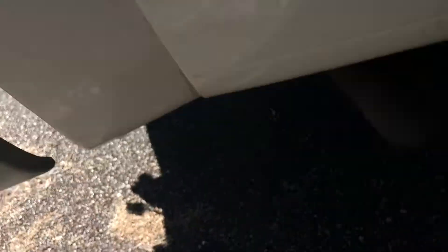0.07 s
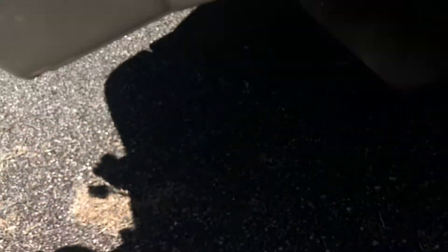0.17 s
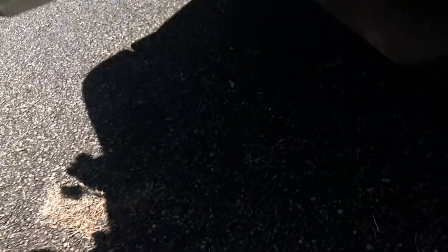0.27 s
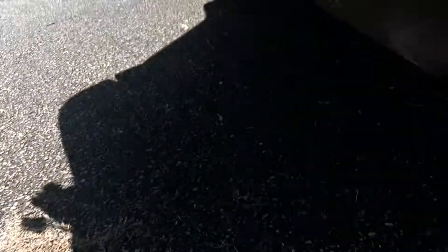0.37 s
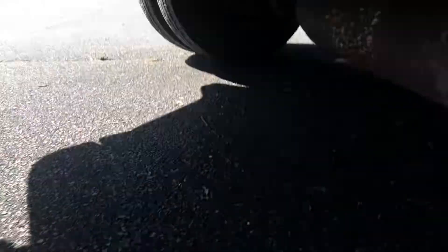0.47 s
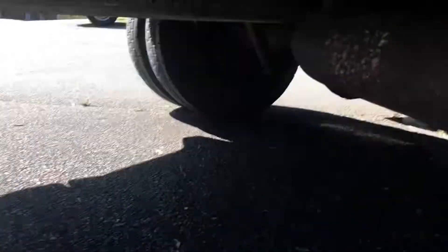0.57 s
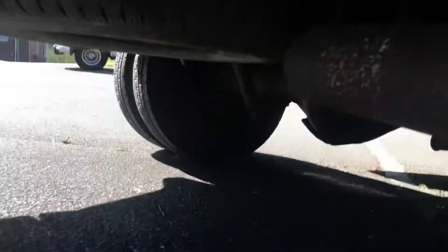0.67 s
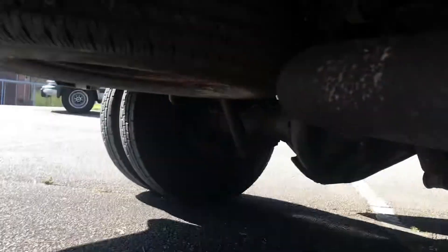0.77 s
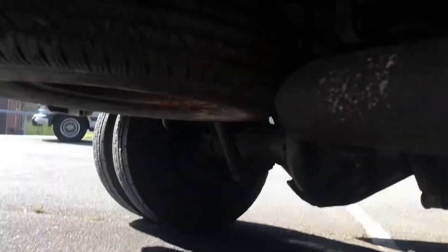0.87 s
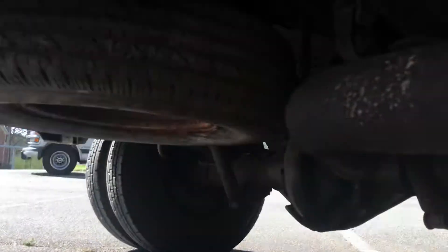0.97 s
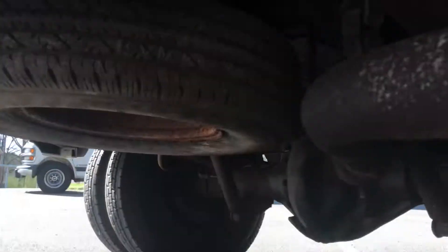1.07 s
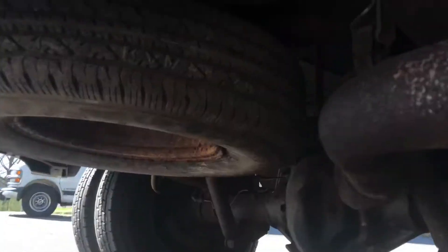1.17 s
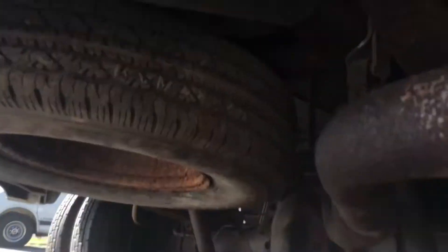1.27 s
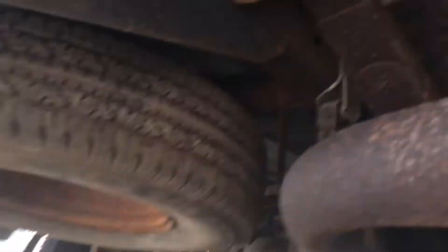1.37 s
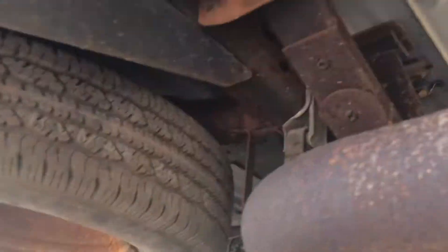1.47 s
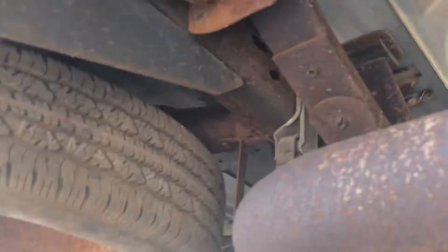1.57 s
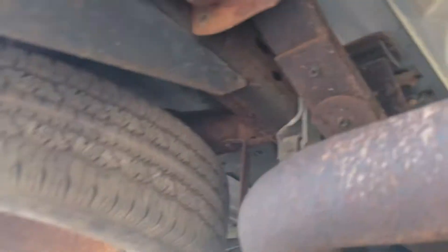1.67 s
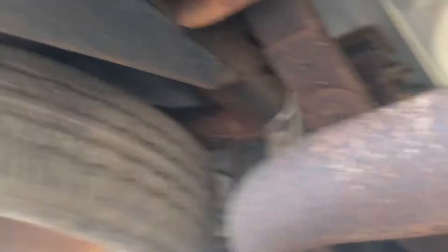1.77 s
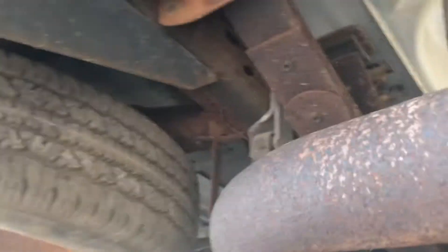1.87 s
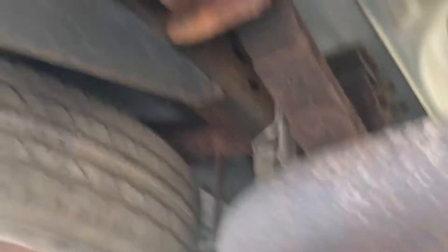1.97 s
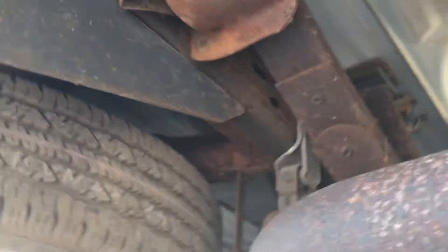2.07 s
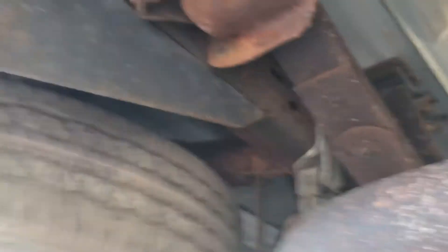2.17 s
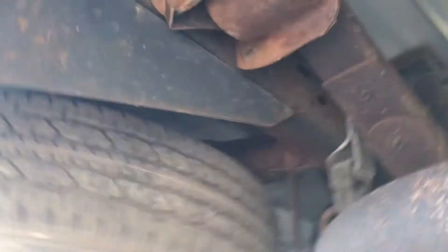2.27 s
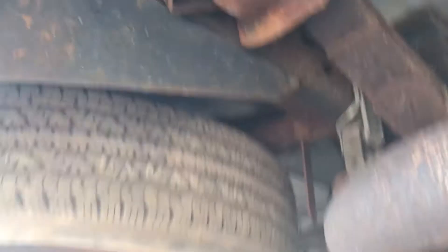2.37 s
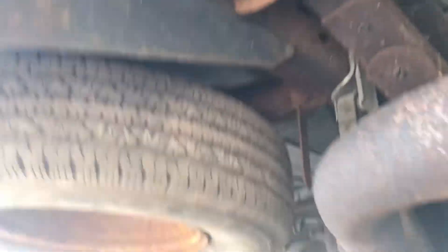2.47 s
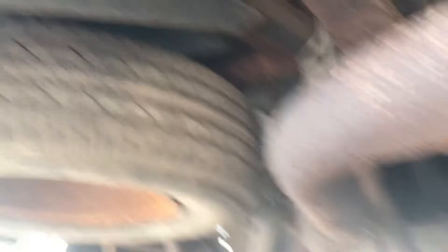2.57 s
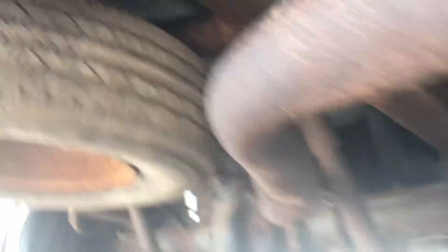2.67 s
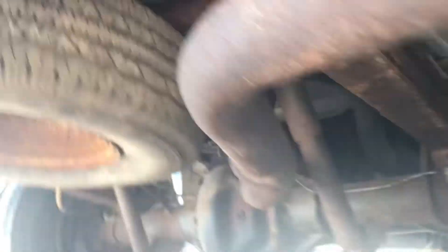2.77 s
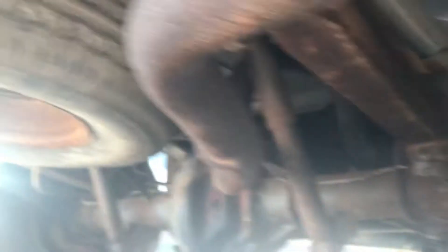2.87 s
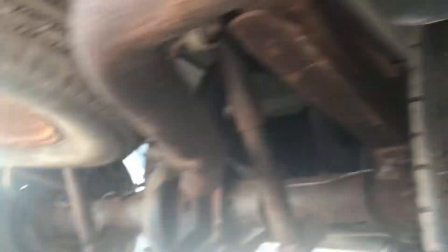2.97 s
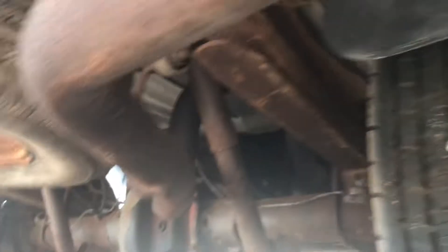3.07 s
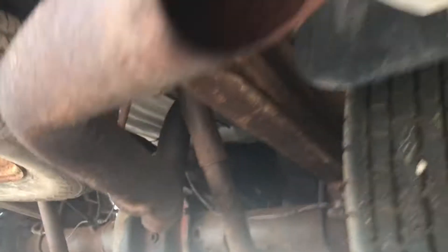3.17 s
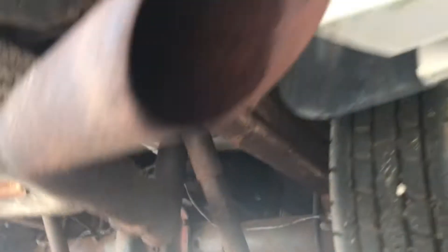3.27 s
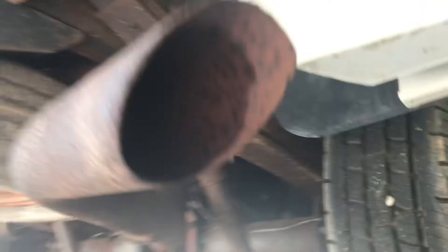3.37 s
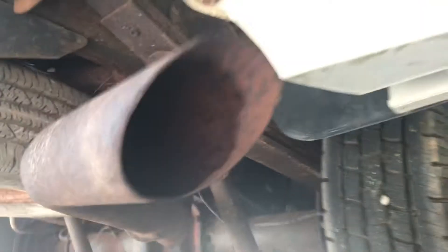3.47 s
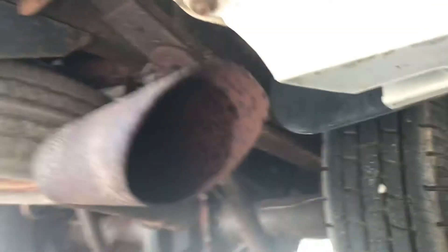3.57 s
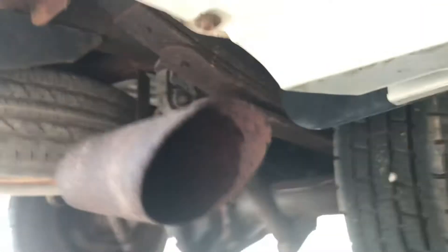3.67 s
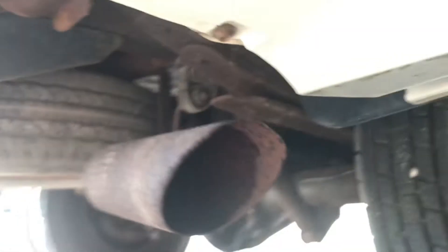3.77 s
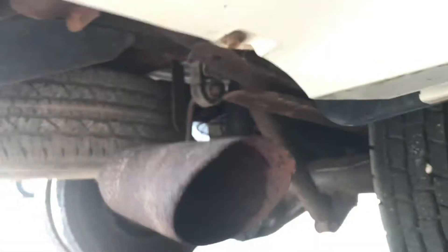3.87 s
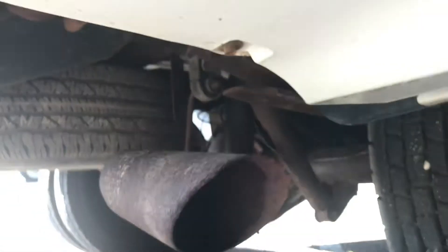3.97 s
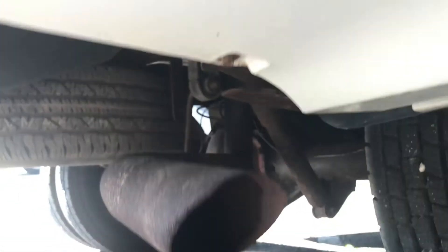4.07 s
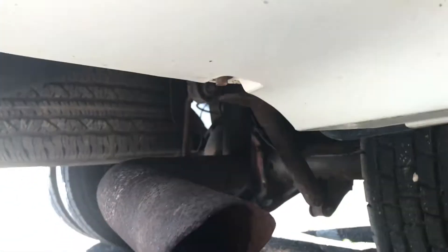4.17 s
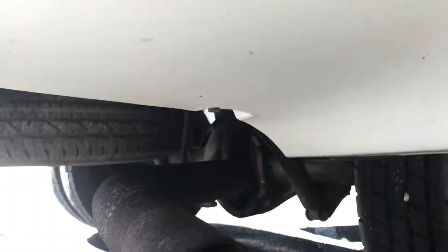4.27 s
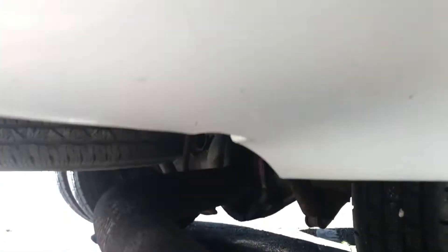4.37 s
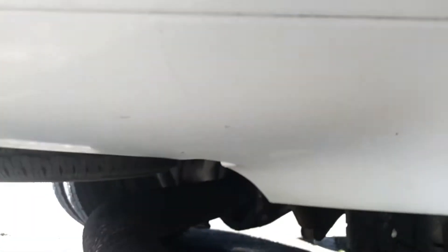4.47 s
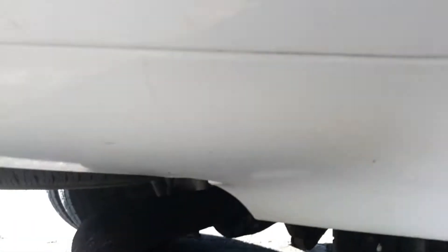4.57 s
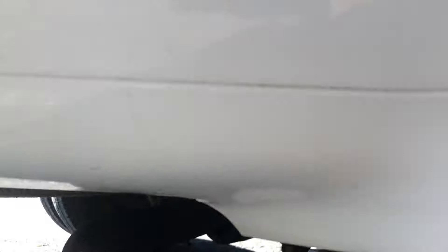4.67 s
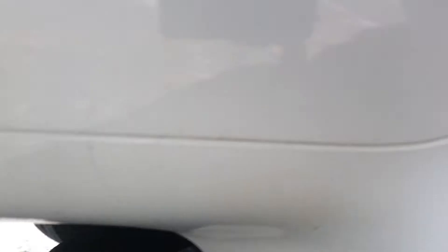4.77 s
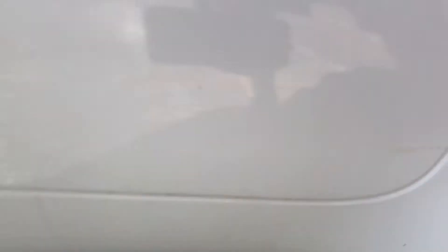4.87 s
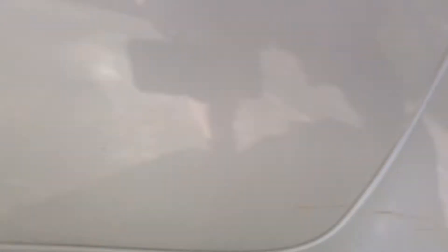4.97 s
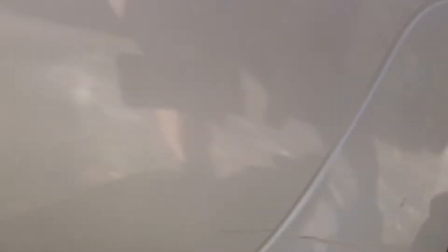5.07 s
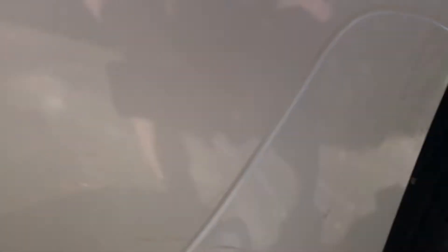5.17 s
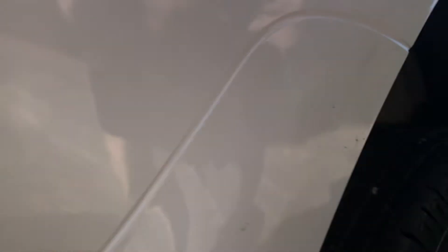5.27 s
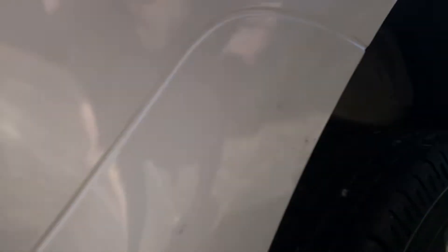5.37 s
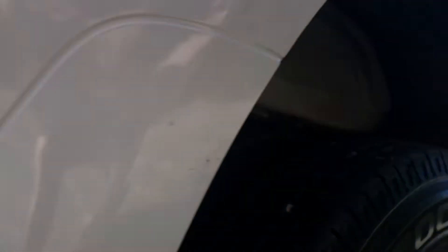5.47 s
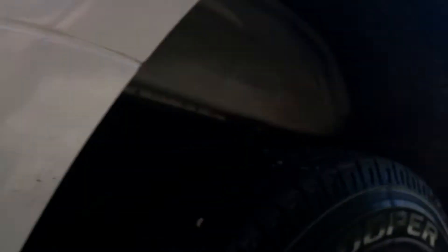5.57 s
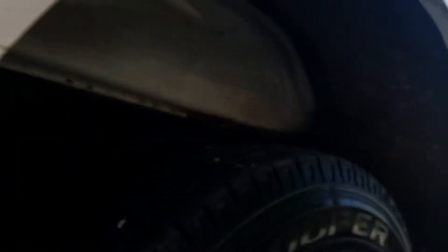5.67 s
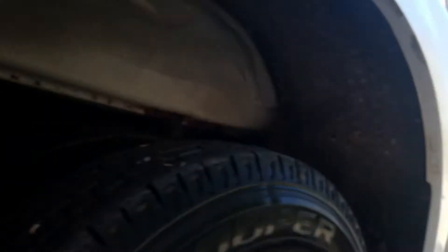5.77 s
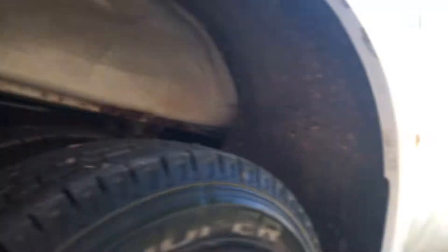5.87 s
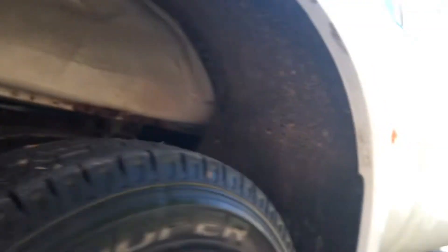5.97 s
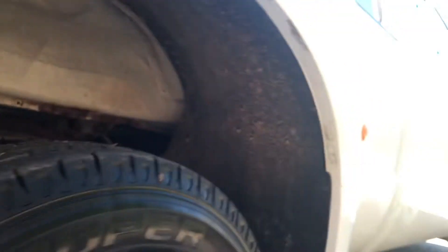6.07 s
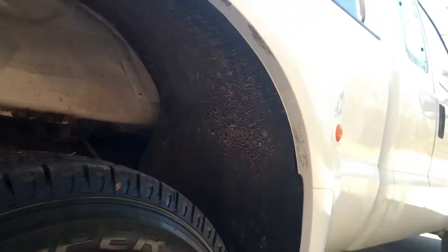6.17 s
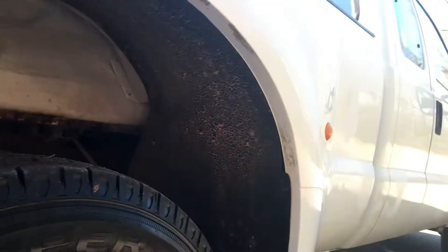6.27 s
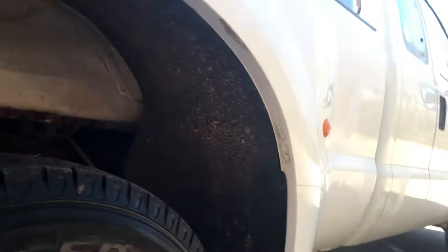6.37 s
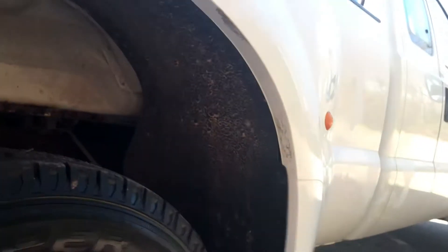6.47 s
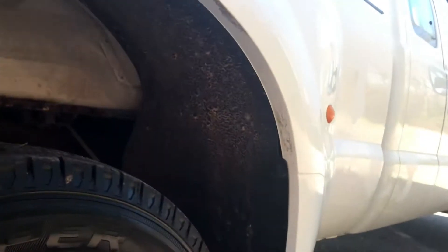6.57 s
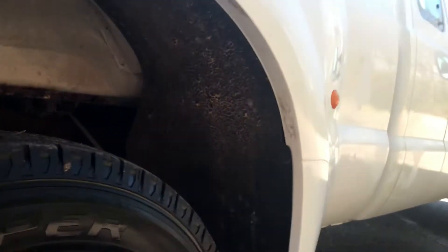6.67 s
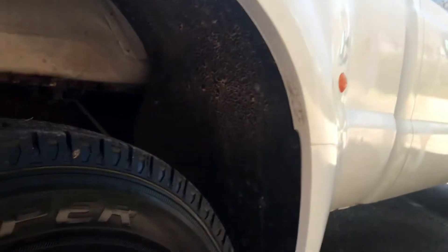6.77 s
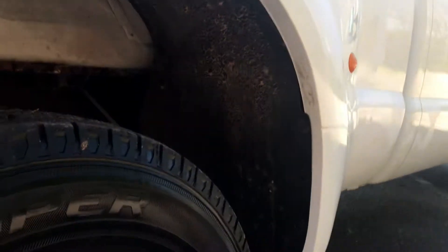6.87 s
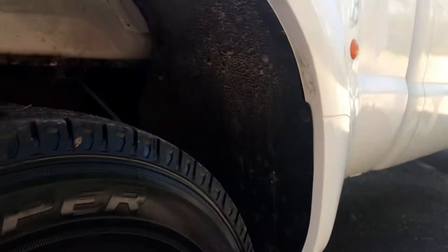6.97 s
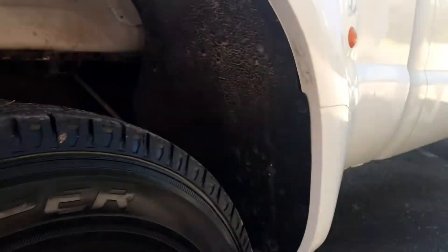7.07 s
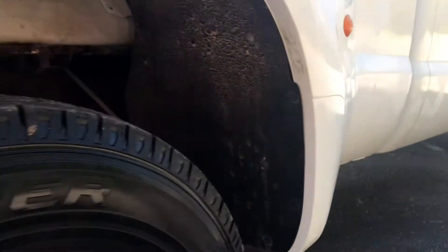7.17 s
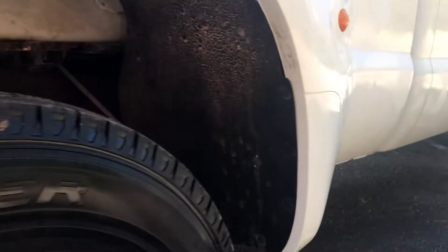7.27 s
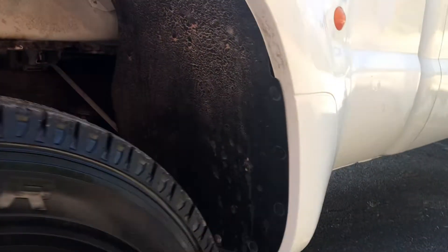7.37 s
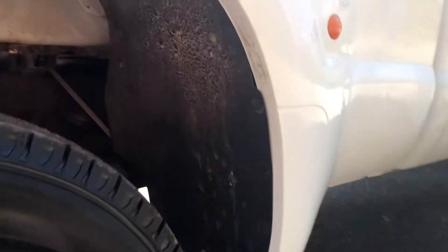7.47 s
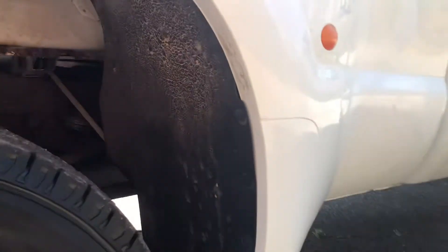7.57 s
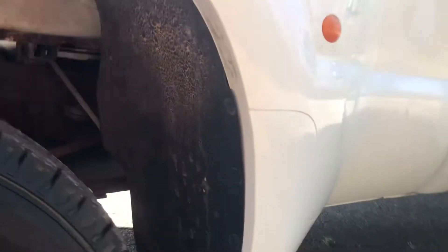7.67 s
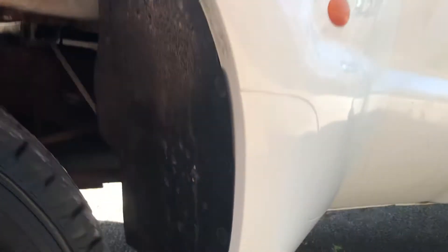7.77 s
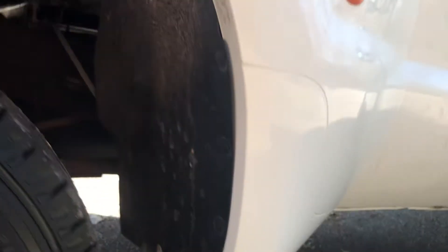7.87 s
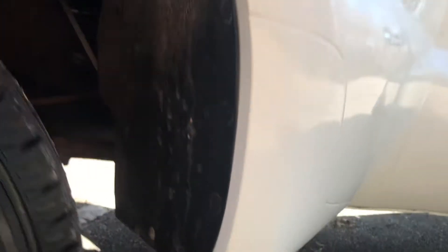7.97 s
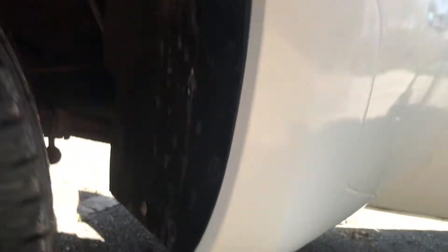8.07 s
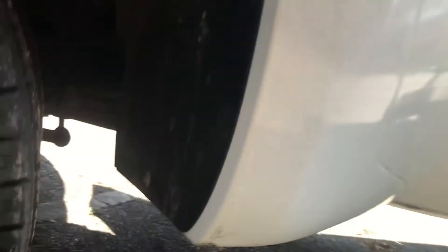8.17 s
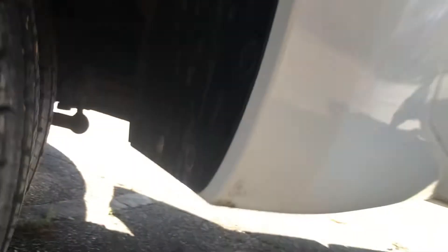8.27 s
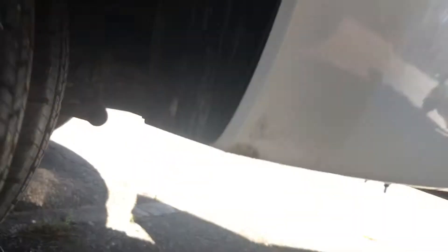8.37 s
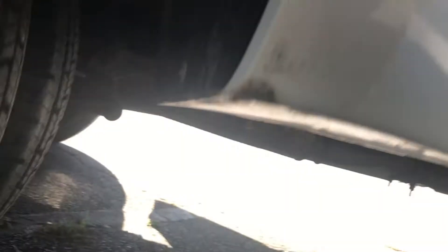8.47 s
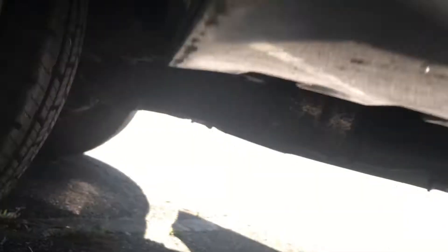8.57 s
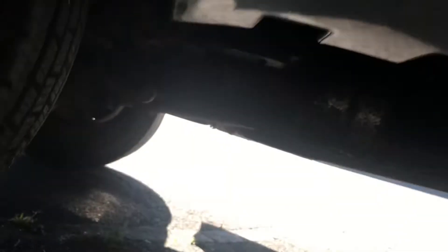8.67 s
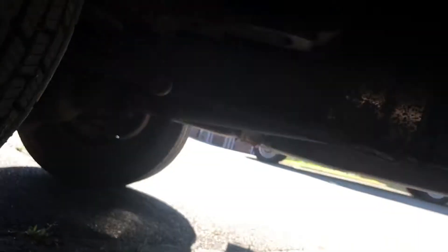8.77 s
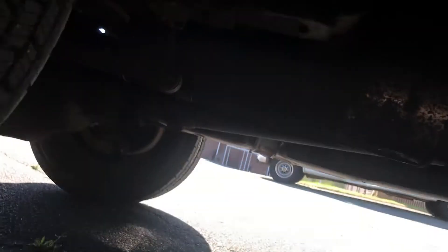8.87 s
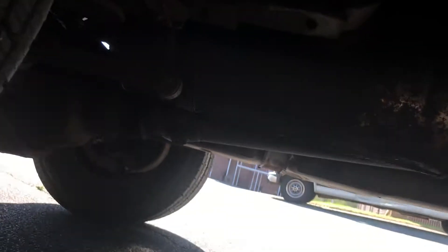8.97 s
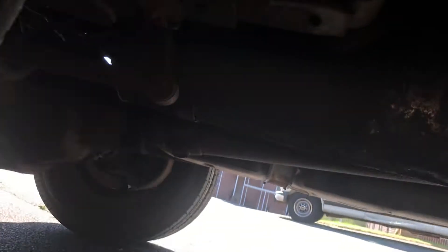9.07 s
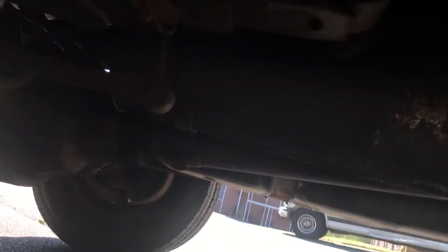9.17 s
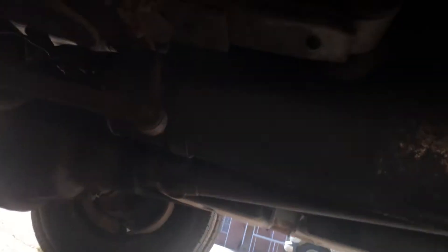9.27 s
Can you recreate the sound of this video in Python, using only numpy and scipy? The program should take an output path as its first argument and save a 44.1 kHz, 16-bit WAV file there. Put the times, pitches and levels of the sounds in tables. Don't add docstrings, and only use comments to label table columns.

```python
import sys
import numpy as np
from scipy import signal
from scipy.fft import rfft, irfft, next_fast_len
from scipy.io import wavfile
from scipy.ndimage import uniform_filter1d, map_coordinates

SR = 44100
rng = np.random.default_rng(int(sys.argv[2]) if len(sys.argv) > 2 else 0)


def invert_db(level):
    return 10 ** (np.asarray(level, dtype=float) / 20)


def persist_wave(psi):
    counts = np.round(np.clip(psi, -1, 1) * 32767).astype(np.int16)
    wavfile.write(sys.argv[1], SR, np.atleast_2d(counts).T)


N = 411012


def unit(x):
    return x / np.sqrt(np.mean(x ** 2) + 1e-20)


def along(points, hz):
    point_hz, value = np.transpose(points)
    return np.interp(np.log(hz + 1), np.log(point_hz + 1), value)


def curves(rows):
    time_s, *columns = np.transpose(rows)
    return [np.interp(np.arange(N) / SR, time_s, column) for column in columns]


def wobble(rate_hz):
    knots = rng.standard_normal(int(N * rate_hz / SR) + 4)
    return map_coordinates(knots, [np.arange(N) * rate_hz / SR])


def filtered(x, response):
    size = next_fast_len(len(x) + SR // 2)
    return irfft(rfft(x, size) * response(np.fft.rfftfreq(size, 1 / SR)), size)[:len(x)]


def colour(points):
    return lambda hz: invert_db(along(points, hz))


def causal(points):
    def response(hz):
        cepstrum = irfft(np.log(invert_db(along(points, hz))))
        half = len(cepstrum) // 2
        cepstrum[1:half] *= 2
        cepstrum[half + 1:] = 0
        return np.exp(rfft(cepstrum))
    return response


def mode(centre_hz, width_hz):
    def response(hz):
        damping = 1j * hz * width_hz
        return (damping / (centre_hz ** 2 - hz * hz + damping)) ** 2
    return response


def combed(depth_db):
    size, bins, frames = 4096, 3, 9
    bands = signal.stft(rng.standard_normal(N + size), nperseg=size)[2]
    field = uniform_filter1d(rng.standard_normal(bands.shape), bins, 0)
    field = uniform_filter1d(field, frames, 1)
    return signal.istft(bands * invert_db(depth_db * unit(field)), nperseg=size)[1][:N]


def by_place(noise, spectra):
    # start_s, place (0 under the tail, 1 at the pipe, 2 alongside)
    path = [(0, 0.29), (2.85, 0.085), (3.0, 0.81), (5.5, 1.36), (6.2, 2), (9.32, 2.1)]
    # centre_hz, width_hz, lift_db
    panels = [(406, 9, 4.5), (596.4, 8.9, 2.5), (700, 14, 4), (813, 14, 2.5), (1057, 15, 2.5),
              (1218, 27, 2), (1362, 15, 1), (1547, 12, 3), (1964, 15, 1), (2240, 13, -1), (2470, 30, 1.5),
              (2615, 18, 1.5)]
    place, = curves(path)

    def lift_db(hz):
        return sum(db * np.exp(-.5 * ((hz - centre) / width) ** 2) for centre, width, db in panels)

    out = np.zeros(N)
    for k, points in enumerate(spectra):
        share = np.clip(1 - abs(place - k), 0, 1)
        out += share * unit(filtered(noise, lambda hz: invert_db(along(points, hz) + lift_db(hz))))
    return out


def hum(firings, tone_db, octave_db):
    # multiple of the firing rate,
    # level_db re octave
    orders = [(.5, -17.5), (1.5, -8.5), (1.7, -10), (1.79, -6.5), (2.2, -7.5), (2.3, -13), (3, -14.5),
              (3.3, -12), (4.8, -21.5), (5, -21.5)]
    octave_lag_rad, third_lag_rad = 0.69, -1.94
    turn = 2 * np.pi * firings
    out = invert_db(tone_db + 0.35 * wobble(14)) * np.cos(turn)
    octave_phase = 2 * turn - octave_lag_rad + 0.48 * wobble(6)
    out += invert_db(octave_db + 0.77 * wobble(12)) * np.cos(octave_phase)
    for order, db in orders:
        start = -third_lag_rad if order == 3 else rng.uniform(0, 2 * np.pi)
        level = invert_db(octave_db + db + 1.9 * wobble(4.6))
        out += level * np.cos(order * turn + start + 0.32 * wobble(4))
    return np.sqrt(2) * out


def thumps(firings, thump_db, second_db, third_db):
    # freq_hz, level_db
    pipe = [(20, -38.5), (31, 1), (50, 3.5), (63, 5), (82, 0.5), (100, 0), (160, 3.5), (190, 4.5),
            (225, -3.5), (255, -6), (280, -27.5), (400, -52), (1500, -120)]
    # start_s, level_db
    late_burns = [(0.647, -11.5), (1.299, -21), (2.524, -24), (2.66, -22), (2.912, -25), (3.098, -22),
                  (3.801, -31), (4.07, -22), (4.459, -21), (5.034, -37), (5.338, -15), (7.262, -33),
                  (8.039, -27)]
    at = np.flatnonzero(np.diff(np.floor(firings)))
    jitter, strength, spread = rng.standard_normal((3, len(at)))
    surplus = np.zeros(N)
    moments = np.clip(at + (.002 * SR * jitter).astype(int), 0, N - 1)
    surplus[moments] = strength * invert_db(1.8 * spread)
    drive = unit(surplus) + .5 * rng.standard_normal(N)
    pops = np.zeros(N)
    for start_s, db in late_burns:
        pops[round(start_s * SR)] = -invert_db(db + 30)
    low = invert_db(thump_db + 3) * unit(filtered(drive, causal(pipe))) + filtered(pops, causal(pipe))
    second = invert_db(second_db - 3) * unit(filtered(drive, mode(centre_hz=206, width_hz=19)))
    third = invert_db(third_db) * unit(filtered(drive, mode(centre_hz=305, width_hz=22.7)))
    return low + second + third


def rush(firings):
    # start_s, rasp_db, bay_db, valve_db, air_db
    levels = [(0.0, -49.5, -55, -71, -80), (0.54, -47.5, -51.5, -67.5, -78), (1.27, -49.5, -50.5, -65, -79),
              (1.66, -46.5, -50, -66, -77), (2.31, -50, -49.5, -66, -78), (2.59, -47.5, -50, -64.5, -78),
              (3.01, -46.5, -50, -67, -78), (3.32, -44.5, -52, -67, -79), (3.68, -48.5, -54, -68, -80),
              (4.15, -46.5, -55, -69.5, -80), (4.54, -46, -54, -65.5, -77), (4.93, -46.5, -56, -69.5, -79),
              (5.42, -51, -54, -67.5, -81), (5.89, -52.5, -52.5, -64, -77), (6.23, -52, -50.5, -62, -72),
              (6.59, -50.5, -49.5, -62.5, -75), (7.17, -50, -50.5, -62.5, -75),
              (7.42, -49.5, -48, -60.5, -73), (7.87, -49, -49, -60, -76), (8.07, -48, -47, -58, -72),
              (8.33, -47.5, -47.5, -60, -74), (8.64, -45.5, -46.5, -58, -69), (8.8, -46, -46, -58, -74),
              (9.32, -43, -45, -59, -73)]
    # freq_hz, level_db
    rasp_colours = [
        [(190, -45), (330, -6), (350, -8.5), (409, -4), (438, -7.5), (493, -10.5), (565, -2.5), (631, -8.5),
         (707, -1), (777, -7), (890, -1.5), (1150, -21), (1500, -44), (2530, -120)],
        [(190, -29), (330, -13.5), (361, -13), (409, 0.5), (451, -14), (496, 0.5), (553, -5), (605, 4),
         (745, -9), (828, 0), (1060, -21), (1150, -20), (1500, -48.5), (2530, -120)],
        [(190, -23), (330, -4), (444, -8), (476, -4.5), (580, 0), (661, -1), (781, -7), (845, -3), (914, -8),
         (1020, -12), (1110, -24), (1150, -16), (1500, -43), (2530, -120)],
    ]
    bay_colours = [
        [(620, -11), (1050, -0.5), (1100, -4), (1380, -2.5), (1470, -5.5), (1750, -9.5), (2010, -9),
         (2530, -10), (3320, -17.5), (3990, -19.5), (4800, -39.5), (6240, -55), (10600, -120)],
        [(620, -38), (1050, -5), (1500, 0.5), (1610, -6.5), (2000, -7.5), (2170, -10), (2320, -6.5), (2670, -9),
         (3100, -14.5), (3890, -18), (4800, -40), (6240, -60), (10600, -120)],
        [(620, -28), (1050, -7), (1110, -6.5), (1250, -3.5), (1370, -3), (1560, 1.5), (1680, -4.5),
         (2850, -8.5), (3110, -11), (4070, -16.5), (4800, -44), (6240, -52), (10600, -120)],
    ]
    # freq_hz, level_db
    valve_colour = [(2590, -15), (4400, 1.5), (5040, -4), (6310, -1.5), (7070, -3.5), (7470, -8),
                    (8250, -6.5), (10600, -16.5), (13800, -47), (22000, -120)]
    # freq_hz, level_db
    air_colour = [(6000, -30.5), (10200, 0), (10600, -2), (11600, 3.5), (15100, -0.5), (15600, -7.5)]
    rasp_db, bay_db, valve_db, air_db = curves(levels)
    puff_s = 6.885
    cycle = 2 * np.pi * (firings - firings[round(puff_s * SR)]) / 10
    swell_db = .5 * np.cos(cycle) + 0.49 * np.cos(3 * cycle) + 0.74 * wobble(9)

    rasp = invert_db(rasp_db + 1.68 + 0.69 * wobble(6.3)) * by_place(combed(2.5), rasp_colours)
    bay = invert_db(bay_db + 0.85 + 0.48 * swell_db) * by_place(combed(2.5), bay_colours)
    valves = invert_db(valve_db + .6 + swell_db) * unit(filtered(combed(1.7), colour(valve_colour)))
    puff_decay = np.exp(-np.mod(cycle + 0.49, 2 * np.pi) / 0.66)
    puff_noise = unit(filtered(rng.standard_normal(N), mode(centre_hz=7800, width_hz=2300)))
    puff = invert_db(valve_db - 3.5 + 1.9 * wobble(4)) * puff_decay * puff_noise
    air = invert_db(air_db + .4 * swell_db) * unit(filtered(combed(1.6), colour(air_colour)))
    return rasp + bay + valves + puff + air


def ticks():
    # start_s, centre_hz, spread_octaves, level_db
    cracks = [(.0002, 12000, 1.5, -48), (.0050, 4460, 0.77, -42.5), (.157, 4000, 0.74, -49),
              (.2145, 5000, .6, -48), (.236, 4500, 0.55, -47.5), (.265, 5000, 0.63, -54),
              (.282, 5000, .8, -56), (.308, 4000, .5, -52), (.319, 12000, .5, -64), (.389, 6000, 1, -58.5),
              (2.6534, 4300, 0.38, -42), (3.391, 4200, .2, -55.5), (4.527, 13000, .3, -62),
              (4.5336, 12000, .35, -51.5), (4.5825, 5000, 0.51, -46), (4.576, 3200, .35, -49),
              (4.591, 5000, .7, -51), (4.6144, 6000, .6, -51.5), (4.7491, 5970, 0.69, -45),
              (4.8125, 4500, 0.54, -51), (4.8718, 7500, 0.36, -53), (4.9132, 3480, 0.94, -41),
              (5.161, 7000, .4, -55), (5.379, 1500, 0.74, -48), (5.779, 8000, .6, -62),
              (5.915, 4530, 0.7, -41.5), (6.5194, 10000, .6, -56), (6.5802, 6350, 0.27, -45),
              (6.5806, 2900, 0.5, -35.5), (6.956, 4000, .8, -57), (7.271, 2500, .5, -49),
              (7.7982, 9000, 1.2, -42), (7.7995, 2000, 0.54, -42), (7.961, 2500, 0.88, -35),
              (8.01, 9000, .6, -50), (8.025, 10000, .6, -53), (8.0375, 3100, .4, -38),
              (8.0574, 12000, .5, -56), (8.1075, 3500, .6, -49), (8.3958, 3000, 1, -41.5)]
    lead = SR // 200
    out = np.zeros(N + SR)
    t = np.arange(-lead, SR // 40) / SR
    for start_s, centre_hz, spread, db in cracks:
        def band(hz):
            octaves = np.log2(hz / centre_hz + 1e-3)
            return np.exp(-.5 * (octaves / spread) ** 2) / (hz + 100)
        decay = (t >= 0) * invert_db(-60 * abs(t) / 0.013)
        snap = 1 + 2.1 * (abs(t) < .0001)
        crack = filtered(decay * snap * rng.standard_normal(len(t)), band)
        out[round(start_s * SR):][:len(t)] += invert_db(db + 7.5) * crack / abs(crack).max()
    return out[lead:N + lead]


def scuffs():
    # start_s, rise_s, length_s, fall_s, level_db, tilt_db_per_octave
    strokes = [(.163, 0.0033, 0.011, .015, -52, 2.5), (0.177, .005, 0.023, 0.043, -45, -6),
               (.205, 0.0085, 0.038, 0.034, -58.5, 2.5), (.25, .01, .05, 0.057, -60.5, -3),
               (2.635, .01, 0.015, .01, -58, -1), (3.385, 0.0049, .015, 0.011, -56, 3),
               (4.243, .03, .04, .02, -46.5, 1), (4.286, 0.0071, 0.019, 0.011, -47.5, -2),
               (4.363, 0.0097, 0.041, .022, -39.5, 2.5), (4.396, .008, .018, 0.044, -40.5, -1.5),
               (4.677, 0.042, 0.057, 0.023, -51.5, 0.5), (4.745, 0.0026, .014, 0.0055, -46, 1),
               (5.076, .004, 0.027, 0.022, -57, 8), (5.099, 0.0073, 0.022, 0.027, -51, 3.5),
               (6.012, .02, 0.044, .02, -65, 11), (6.10, 0.018, 0.033, .02, -63, 8),
               (6.286, .01, .03, .02, -64, 3), (6.388, 0.0068, 0.033, 0.011, -59, 2),
               (7.898, .01, .015, .01, -57, 2.5), (7.924, 0.013, .072, .008, -42, -4),
               (7.93, .01, 0.041, .02, -55, 4), (8.002, .005, 0.032, .03, -47, -1.5),
               (8.475, .04, 0.077, .05, -53.5, 1)]
    # freq_hz, level_db
    grit_colour = [(500, -21), (900, 6), (1500, 3), (2400, 3.5), (4500, 0.5), (8000, -8), (10500, -13),
                   (15000, -24.5)]
    out = np.zeros(N + SR)
    t = np.arange(SR // 3) / SR
    for start_s, rise_s, length_s, fall_s, db, tilt_db in strokes:
        stroke = np.clip(t / rise_s, 0, 1) * np.exp(-np.clip(t - length_s, 0, None) / fall_s * 2)
        struck = rng.random(len(t)) < 110 / SR
        snaps = np.convolve(struck, np.exp(-t[:200] / .0012))[:len(t)]
        lumps = invert_db(1.8 * unit(uniform_filter1d(rng.standard_normal(len(t)), 200)))
        rough = lumps * (1 + 1.6 * snaps) * rng.standard_normal(len(t))
        hollows = list(zip(np.geomspace(500, 16000, 24), rng.normal(0, 1.6, 24)))

        def response(hz):
            tilt = tilt_db * np.log2(hz / 4000 + 0.18)
            return invert_db(along(grit_colour, hz) + along(hollows, hz) + tilt)
        out[round(start_s * SR):][:len(t)] += invert_db(db) * stroke * unit(filtered(rough, response))
    return out[:N]


def scrape():
    # centre_hz, width_hz, level_db
    hollows = [
        (886, 320, 2),
        (2440, 330, -4.5),
    ]
    t = np.arange(N) / SR
    out = np.zeros(N)
    for (hz, width_hz, db), (peak_s, length_s) in zip(hollows, [(4.414, 0.0058), (4.408, 0.016)]):
        rub = np.exp(-.5 * ((t - peak_s) / length_s) ** 2)
        ring = unit(filtered(rng.standard_normal(N), mode(hz, width_hz)))
        out += invert_db(db - 34) * rub * ring
    return out


def scene():
    # start_s, firing_rate_hz
    idle = [(0, 63.99), (0.1, 63.99), (0.3, 63.1), (0.5, 63.27), (0.7, 62.35), (0.9, 62.22), (1.1, 62.49),
            (1.3, 62.76), (1.5, 63.74), (1.7, 63.37), (1.9, 63.11), (2.1, 63.16), (2.3, 63.45),
            (2.5, 63.87), (2.7, 62.8), (2.9, 63.96), (3.1, 61.98), (3.3, 63.09), (3.5, 61.64), (3.7, 60.5),
            (3.9, 60.99), (4.1, 61.66), (4.3, 61.96), (4.5, 62.36), (4.7, 62.15), (4.9, 62.39),
            (5.1, 62.41), (5.3, 62.63), (5.5, 62.36), (5.7, 62.63), (5.9, 62.6), (6.1, 62.79), (6.3, 63.29),
            (6.5, 63.45), (6.7, 62.85), (6.9, 63.19), (7.1, 63.04), (7.3, 62.37), (7.5, 62.59),
            (7.7, 62.45), (7.9, 62.47), (8.1, 62.61), (8.3, 62.66), (8.5, 62.85), (8.7, 62.78),
            (8.9, 62.64), (9.1, 63.14), (9.32, 63.14)]
    # start_s, firing_tone_db
    tone = [(0.0, -25), (0.07, -29.5), (0.21, -28.5), (0.26, -26.5), (0.6, -25.5), (0.72, -20), (0.8, -24),
            (1.06, -22), (1.25, -25), (1.32, -19.5), (1.4, -24), (1.48, -24), (1.53, -26.5), (1.71, -22.5),
            (1.84, -23.5), (1.89, -26.5), (2.05, -21), (2.1, -23), (2.18, -26), (2.26, -25), (2.49, -23),
            (2.52, -27.5), (2.59, -22.5), (2.96, -22), (2.98, -25.5), (3.09, -18), (3.17, -19), (3.35, -24),
            (3.6, -20.5), (3.97, -23), (4.07, -24), (5.89, -30.5), (5.99, -34), (6.2, -30.5), (6.26, -33.5),
            (6.46, -32), (6.51, -39), (6.7, -32), (6.85, -34.5), (6.9, -31.5), (7.81, -35), (7.91, -31.5),
            (7.97, -35), (8.07, -31.5), (8.12, -33), (8.23, -31.5), (8.41, -34.5), (8.59, -31.5),
            (8.67, -35), (8.69, -32.5), (8.98, -30.5), (9.03, -33), (9.14, -31.5), (9.29, -33), (9.32, -26)]
    # start_s, octave_db, thump_db, second_pipe_mode_db, third_pipe_mode_db
    exhaust = [(0.0, -42.5, -47.5, -38, -56.5), (0.3, -37, -44.5, -49, -49.5), (0.6, -38, -42, -39.5, -43),
               (0.9, -37.5, -42.5, -39, -52.5), (1.2, -36.5, -43.5, -44.5, -48.5),
               (1.5, -35, -40, -39, -47.5), (1.8, -34, -41.5, -44, -47.5), (2.1, -35.5, -41.5, -44, -49),
               (2.4, -34.4, -40.5, -44, -47.5), (2.7, -36.5, -38.9, -42, -46),
               (3.0, -34, -35.5, -34, -41.5), (3.3, -33.5, -38, -35.5, -44),
               (3.6, -36.9, -42, -40.5, -44.5), (3.9, -37.5, -40.5, -37.5, -53),
               (4.2, -35.5, -41.5, -34, -51), (4.5, -36.5, -40, -37, -52), (4.8, -41, -41, -43.5, -54.5),
               (5.1, -38.5, -42, -43, -61), (5.4, -43, -44.5, -46.5, -69), (5.7, -40, -45.5, -55, -63),
               (6.0, -43.5, -46, -49.5, -59), (6.3, -42.0, -45, -48, -58.5),
               (6.6, -42.4, -41.5, -45.4, -55), (6.9, -42, -46, -45.5, -57.5),
               (7.2, -42, -41.5, -45.5, -55.4), (7.5, -45, -42.5, -45.5, -59),
               (7.8, -41, -42.5, -44.9, -51.5), (8.1, -43, -44.5, -38.5, -52.5),
               (8.4, -41.5, -45, -55, -51.8), (8.7, -42, -44, -43.5, -54.7),
               (9.0, -40.5, -42.5, -48, -54.5), (9.3, -40.5, -42, -47, -54), (9.32, -38.4, -34, -50.1, -57)]
    rate_hz, = curves(idle)
    tone_db, = curves(tone)
    octave_db, *pipe_db = curves(exhaust)
    firings = np.cumsum(rate_hz) / SR + 0.637
    engine = hum(firings, tone_db - .3, octave_db - 0.6) + thumps(firings, *pipe_db) + rush(firings)
    return (engine + ticks() + scuffs() + scrape())[None]


def band_limit(x):
    return signal.sosfilt(signal.butter(12, 15700, fs=SR, output="sos"), x)


def record(dry):
    def response(hz):
        port = invert_db(-2.5 * np.exp(-.5 * ((hz - 10450) / 300) ** 2))
        return port / (1 + (30 / (hz + 1)) ** 32)
    return band_limit(filtered(dry[0], response)[None])


dry = scene()
out = record(dry)
persist_wave(out)
```